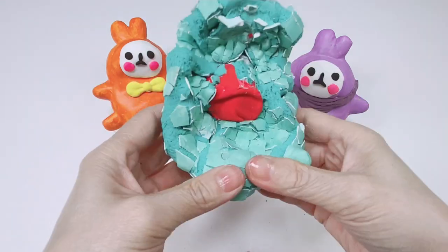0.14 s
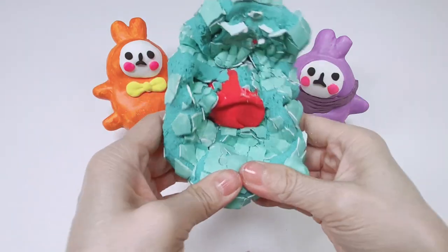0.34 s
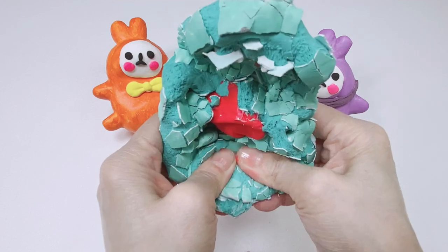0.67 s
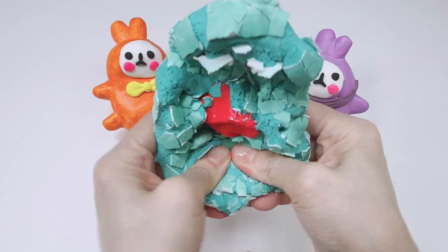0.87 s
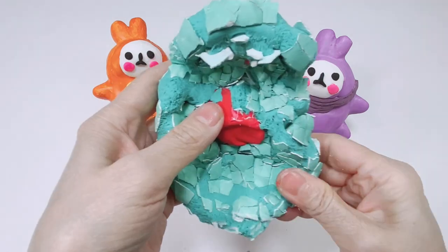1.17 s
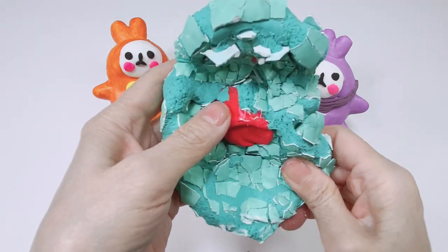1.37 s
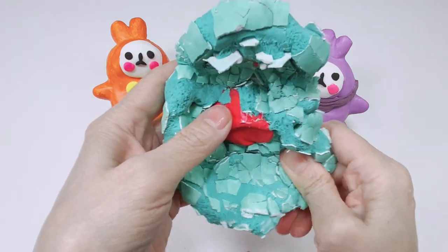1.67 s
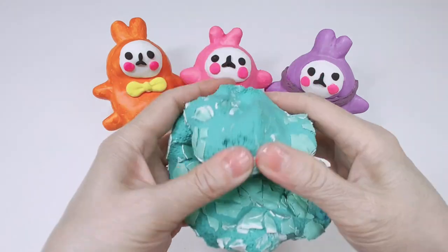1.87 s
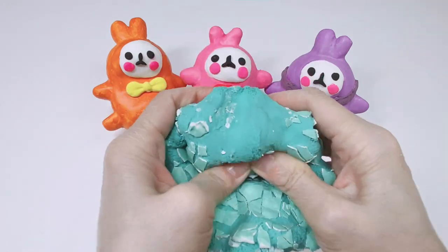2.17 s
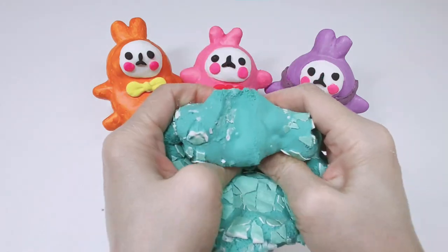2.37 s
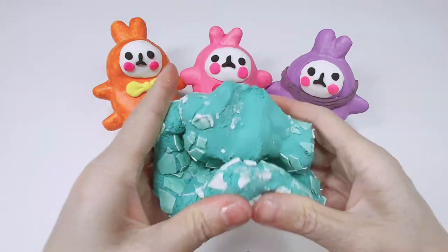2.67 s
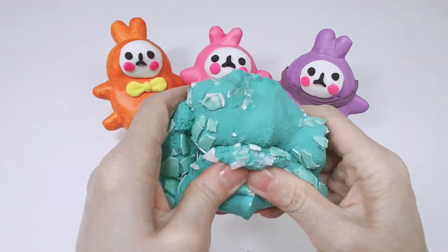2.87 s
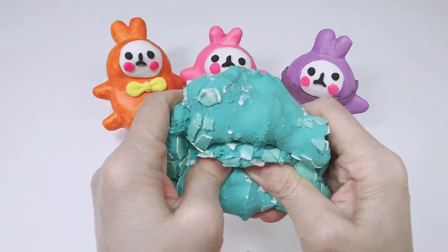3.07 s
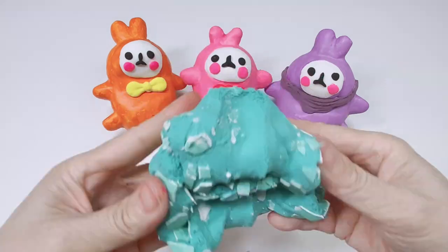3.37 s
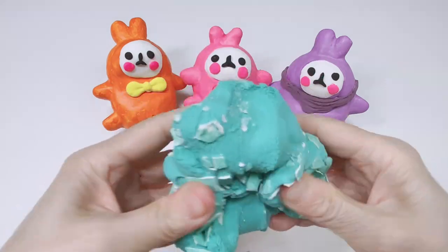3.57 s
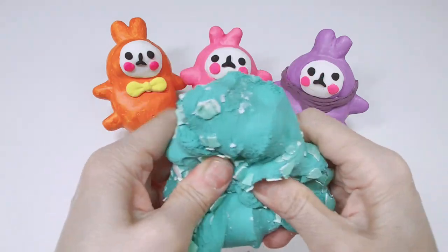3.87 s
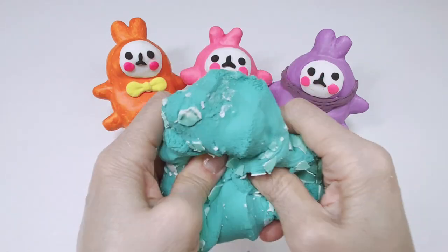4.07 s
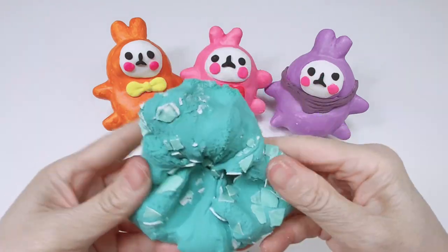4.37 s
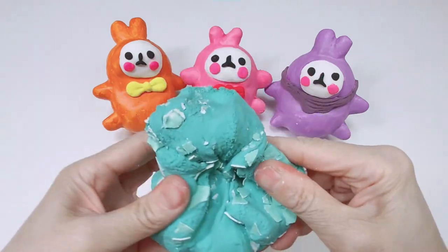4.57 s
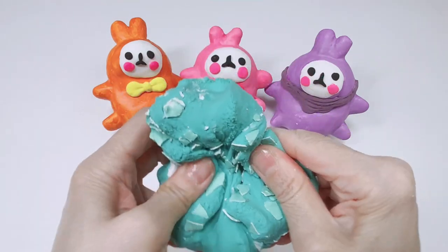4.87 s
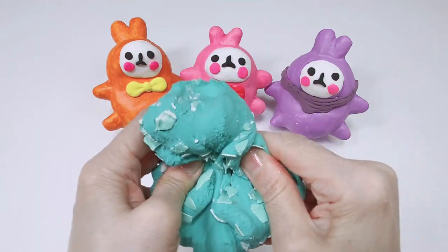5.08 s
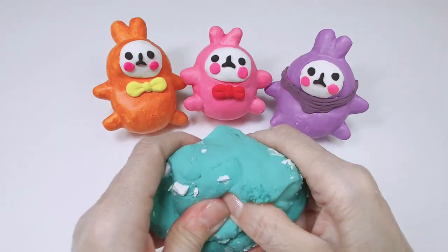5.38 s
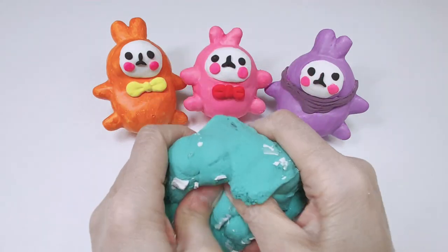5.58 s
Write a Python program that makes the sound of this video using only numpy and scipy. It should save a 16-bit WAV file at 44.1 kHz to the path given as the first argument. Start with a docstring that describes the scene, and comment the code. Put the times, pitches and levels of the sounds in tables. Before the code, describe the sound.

A close stereo pickup in a small, fairly dry room catches hands crushing soft clay inside a brittle dried crust. A tiny silent gap comes almost at once, then crackling builds to a thick cluster of bright snaps at 0.5-0.8 seconds. A quiet stretch follows, with the dull background hiss dipping until about 1.0 and a faint rub near 1.3. Crisp flakes break at 1.4-1.7; a heavier, lower crunch peaks around 2.2, then crumbles away. Mixed snaps and grit continue through 2.4-3.2, thinning before one sharp bright click near 3.5 and a soft rub at 3.6. Strong cracks return at 3.8-4.1, then thin, high ticks around 4.4, a small cluster at 4.7-4.95, and a lighter gritty squeeze near 5.4, trailing in small snaps to about 5.7. Abrupt silences of a few hundredths of a second recur near 1.0, 1.8, 2.65, 3.4, 4.3 and 5.2.

```python
"""In a small room, close to a stereo microphone, two hands crush a lump of soft clay with a dried, brittle crust.
Each squeeze builds and lets go, grinding crumbs and fine grit, made as showers of tiny damped rings.
Often a whole flake snaps off: it rings for a few cycles, cracks along its edge and knocks on the shell.
Skin rubs as short swells of grainy noise; a dull hiss lies behind, and its level dips once.
A limiter holds the loudest peaks, and short silent gaps interrupt the sound."""
import sys
import numpy as np
from scipy import signal
from scipy.fft import rfft, irfft
from scipy.io import wavfile
from scipy.ndimage import uniform_filter1d, minimum_filter1d

SR = 44100
rng = np.random.default_rng(int(sys.argv[2]) if len(sys.argv) > 2 else 0)


def log_audio(samples):
    """Write samples as a 16-bit WAV file to the path given in sys.argv[1]."""
    # one column per channel
    frames = np.atleast_2d(samples).T
    # limit to full scale, then quantise
    limited = np.clip(frames, -1, 1)
    pcm = np.round(limited * 32767).astype(np.int16)
    wavfile.write(sys.argv[1], SR, pcm)


N = 253134  # length in samples

# The loud breaks of the crust. Each row: start in seconds, flake pitch in Hz, relative level of the ring in dB,
# depth of the break in dB (a deeper break has more crack and knock beside its ring).
BREAKS = [(0.1686, 10500, -24, -33), (0.242, 4850, -32.5, 5.5), (0.266, 3200, -28, 0),
          (0.3015, 2890, -12, -1.5), (0.3033, 1720, -12, 2.5), (0.4058, 2150, -25, 7),
          (0.4089, 1560, -13.5, -13.5), (0.465, 3380, -34, 12.5), (0.523, 1130, -19.5, -5.5),
          (0.5568, 1710, -23, 3), (0.5752, 2700, -24, -11), (0.584, 2320, -11.5, -6.5),
          (0.6002, 6030, -16, -20), (0.603, 2850, -11, -5), (0.6083, 1530, -6.5, -31),
          (0.6194, 2000, -26, 5), (0.6262, 6060, -20, -3), (0.664, 5470, -21, -2),
          (0.6713, 3150, -19.5, -8), (0.7067, 2770, -20, 0.5), (0.716, 5770, -8, -9.5),
          (0.7288, 5700, -14, -7), (0.7371, 5150, -25, 9.5), (0.801, 3230, -13.5, -14),
          (1.175, 4700, -32.5, -10), (1.3634, 2980, -25.5, -8), (1.388, 3240, -17.5, 1.5),
          (1.435, 3300, -7, -3.5), (1.441, 5660, -11, -20), (1.4638, 5200, -17, -19),
          (1.5124, 5400, -27, 6), (1.5463, 6100, -26.5, 2), (1.601, 4870, -19.5, -2),
          (1.6556, 5400, -26, 2), (1.686, 3000, -23, -10), (1.6923, 3030, -14, -5.5),
          (1.722, 3230, -22.5, 5), (1.897, 1350, -19.5, -16.5), (2.1043, 2380, -23.5, -1.5),
          (2.147, 1900, -14, -10), (2.161, 1300, -17, -14), (2.1674, 1300, -20.5, -6),
          (2.1763, 1300, -17, -17), (2.1866, 1190, -15, -5), (2.195, 2490, -16, -17),
          (2.2111, 1510, -13.5, 1), (2.224, 1600, -3.5, -7.5), (2.2278, 2370, -6.5, 1.5),
          (2.2463, 2780, -25, -1), (2.268, 1300, -25, -4), (2.304, 1940, -16, -16),
          (2.3086, 2900, -10.5, -7.5), (2.424, 1650, -10, -26), (2.467, 2880, -29, -10),
          (2.4842, 2430, -26, -8), (2.505, 3500, -22, -18), (2.5236, 4200, -26, -10),
          (2.5424, 1790, -25, -8), (2.5902, 1780, -23, -1.5), (2.6121, 1620, -20.5, -5),
          (2.6842, 2830, -33, -1), (2.7373, 7700, -21, -3.5), (2.7616, 7800, -25, -8),
          (2.7855, 3250, -26, -11), (2.8033, 8000, -31, 6.5), (2.833, 3130, -11.5, -11),
          (2.8405, 1880, -16.5, -16), (2.868, 3230, -18.5, -17), (2.878, 1650, -18.5, -18),
          (2.9247, 2520, -25.5, 8), (2.9702, 2550, -14.5, -16), (2.982, 1830, -21.5, 5.5),
          (2.9866, 1390, -20, -2), (3.035, 10000, -28, 0), (3.0368, 3100, -10, -12.5),
          (3.1158, 2700, -20, -27), (3.131, 6100, -16.5, -9), (3.132, 2800, -15.5, -8),
          (3.1989, 6100, -13.5, 0.5), (3.492, 9500, -6, -21), (3.6124, 1310, -26, -8),
          (3.6355, 1700, -32.5, 10.5), (3.7098, 4600, -29.5, 15.5), (3.7926, 3600, -7, -8),
          (3.812, 2450, -12, -9), (3.82, 2200, -20, -10), (3.9089, 2350, -4, -11),
          (3.9104, 1700, -10, -4.5), (3.984, 5800, -21, -5), (4.012, 4500, -22, 2), (4.0348, 4940, -13, 0),
          (4.039, 2270, -22, 2), (4.0636, 3180, -11, -1.5), (4.245, 2490, -25, -34),
          (4.2547, 2880, -16, -40), (4.3513, 12000, -24, -18), (4.3926, 10500, -12.5, -13),
          (4.433, 10600, -27, -7), (4.4855, 9800, -34, -1), (4.534, 10600, -24, -22),
          (4.7185, 3800, -20.5, -7.5), (4.7676, 2930, -12.5, -1.5), (4.818, 4700, -19, 0),
          (4.8261, 4540, -13, -1), (4.8287, 4000, -16.5, 3), (4.8576, 4640, -24.5, 8),
          (4.89, 2580, -18.5, 2.5), (4.9385, 2770, -14.5, -4), (5.0689, 1520, -25.5, -24),
          (5.1101, 3260, -22, -11.5), (5.2705, 2800, -25, -7.5), (5.33, 3070, -21, -17),
          (5.386, 3860, -30, -15), (5.4364, 3020, -23.5, -2), (5.4855, 2900, -28, -8),
          (5.5065, 2680, -17.5, -20), (5.5825, 2850, -30.5, -6), (5.6046, 2570, -27, -20),
          (5.6413, 2550, -20.5, -6.5), (5.663, 3300, -30.5, 8.5), (5.7113, 2940, -17.5, -15),
          (5.7287, 4400, -21.5, -2)]


def undb(db):
    """Turn decibels into gain."""
    return 10 ** (np.asarray(db) / 20)


def unit(x):
    """Scale to an energy of one in each channel."""
    energy = np.sum(x ** 2, axis=-1, keepdims=True)
    return x / np.sqrt(energy + 1e-18)


def band(x, lo_hz, hi_hz):
    """Keep the sound between two pitches, with a filter that only looks back in time."""
    top_hz = min(hi_hz, SR / 2 - 1000)
    return signal.sosfilt(signal.butter(2, [lo_hz, top_hz], "band", fs=SR, output="sos"), x)


def colour(x, points, size=4096):
    """Shape the spectrum through (Hz, dB) points, with a filter that only looks back in time."""
    hz, db = np.transpose(points)
    bins_hz = np.fft.rfftfreq(size, 1 / SR)
    log_gain = np.log(undb(np.interp(np.log(bins_hz + 1), np.log(hz), db)))
    # folding the cepstrum forward puts the filter's energy as early as possible
    cepstrum = irfft(log_gain)
    cepstrum[1:size // 2] *= 2
    cepstrum[size // 2 + 1:] = 0
    response = irfft(np.exp(rfft(cepstrum)))
    return signal.fftconvolve(x, response[None], axes=1)[:, :x.shape[1]]


def pair(mid, side, likeness):
    """Mix two unrelated signals into left and right with a given correlation."""
    c = np.clip(likeness, -1, 1)
    left_right = np.array([[1], [-1]])
    return (mid * np.sqrt(1 + c) + left_right * side * np.sqrt(1 - c)) / np.sqrt(2)


def add(out, x, s):
    """Mix a short sound in at time s, in seconds."""
    i = max(0, int(s * SR))
    out[:, i:i + x.shape[1]] += x[:, :max(0, N - i)]


def snaps(ring_cycles=0.46, crack_s=0.00033, knock_s=0.001, crack_likeness=0.89, knock_likeness=0.94,
          lag_s=.000004, ring_db=1.5, crack_db=2.0, knock_db=.5, size=512):
    """Each break: a flake rings, its edge cracks, the clay-filled shell knocks; depth and flake size set the mix."""
    # The tone of the shell's knock. Each row: frequency in Hz, level in dB.
    shell_tone = [(100, -20), (280, -21), (500, -8.5), (800, -6), (1150, 2), (1900, -1), (2800, -5.5),
                  (5000, -12.5), (10000, -51)]
    # flakes larger (lower) than a middling one crack less; the larger the flake, the harder it knocks
    mid_flake_hz, crack_db_per_octave, knock_db_per_octave = 2700, 14, -6.5
    knock_share = 0.8  # dB of knock for each dB of depth
    out = np.zeros((2, N))
    t = np.arange(size) / SR
    span = np.sqrt(.002 * SR)  # levels are rms over 2 ms
    for s, hz, db, depth_db in BREAKS:
        chance = rng.standard_normal((5, size))
        octave = np.log2(hz / mid_flake_hz)
        crack_level = depth_db + crack_db + crack_db_per_octave * min(octave, 0)
        knock_level = knock_share * depth_db + knock_db + knock_db_per_octave * octave

        # a flake off centre reaches one port of the microphone a little sooner
        age = np.maximum(t + np.array([[1], [-1]]) * lag_s * chance[4, 0], 0)
        ring = np.sign(chance[4, 1]) * flake(age, hz, ring_cycles)

        # the fracture speeds up, then runs out
        fracture = pair(chance[0], chance[1], crack_likeness) * t * np.exp(-t / crack_s)
        crack = unit(band(fracture, 3440, 10700))

        thud = pair(chance[2], chance[3], knock_likeness) * np.exp(-t / knock_s)
        knock = unit(colour(thud, shell_tone, size=size))

        mix = undb(ring_db) * ring + undb(crack_level) * crack + undb(knock_level) * knock
        add(out, span * undb(db) * mix, s)
    return out


def flake(age, hz, ring_cycles=0.46, ring_s=.000045):
    """A clay-damped flake swings up within about a cycle and dies after a few more."""
    swing = age / (ring_cycles / hz + ring_s)
    return unit(swing * np.exp(-swing) * np.sin(2 * np.pi * hz * age))


def kneading(size=64):
    """Levels in dB of crumbs and of grit: each squeeze swells to its hardest moment and falls away;
    around each break the crust splinters just before and sheds debris just after."""
    # Each row: hardest moment in seconds, build and release times in seconds for a change of 10 dB,
    # level of the crumbs in dB, level of the fine grit over the crumbs in dB.
    squeezes = [(0.058, 0.035, 0.023, -33, -5.5), (0.32, 0.17, 0.03, -36.5, -3.5),
                (0.42, .02, 0.052, -40, -16), (0.62, 0.22, 0.16, -29.5, -0.5),
                (1.29, 0.049, 0.14, -41.5, 3), (1.44, .04, 0.11, -34, -1), (1.72, 0.11, 0.031, -52, 19),
                (1.93, 0.088, 0.21, -40.5, -4.5), (2.199, 0.1, 0.32, -24, -12),
                (2.42, 0.14, 0.13, -31.5, -26), (2.86, 0.14, 0.14, -32, -2), (3.04, 0.19, 0.31, -32.5, -5),
                (3.78, 0.14, .06, -29, -1.5), (3.93, 0.045, 0.094, -34, -2),
                (4.071, 0.07, 0.023, -24.5, -8), (4.199, .04, 0.04, -36, 0), (4.78, 0.42, 0.33, -47.5, 10),
                (5.38, 0.073, .14, -28.5, -7)]
    # small fractures around a break: times for 10 dB before and after it, and level against the break's own
    splinter_s, debris_s, debris_db = 0.0061, 0.014, -16
    fine_flake_hz = 4460  # flakes above this shed mostly grit, those below mostly crumbs
    t = np.arange(0, N, size) / SR

    def swell(s, build_s, release_s, db):
        """Power that rises and falls evenly in dB."""
        steps_down = np.maximum((s - t) / build_s, (t - s) / release_s)
        return undb(db - 10 * np.clip(steps_down, 0, 20)) ** 2

    crumbs = grit = 0
    for s, build_s, release_s, db, grit_db in squeezes:
        power = swell(s, build_s, release_s, db)
        crumbs = crumbs + power
        grit = grit + power * undb(grit_db) ** 2
    for s, hz, db, depth_db in BREAKS:
        power = swell(s, splinter_s, debris_s, db + debris_db)
        fine = hz ** 2 / (hz ** 2 + fine_flake_hz ** 2)
        crumbs = crumbs + power * (1 - fine)
        grit = grit + power * fine
    every_sample = np.arange(N) / SR
    return [np.interp(every_sample, t, 10 * np.log10(power)) for power in (crumbs, grit)]


def crackle(level_db, pitch_hz, octaves, per_s, spread_db, lag_s, doubling_db=14, count=16000, size=128):
    """A shower of tiny fractures, each with its own pitch; harder kneading breaks more of them and larger ones."""
    when, luck, strength = rng.random((count, 3)).T
    height, place = rng.standard_normal((count, 2)).T
    start = (when * N).astype(int)
    candidates_per_s = count * SR / N

    # per_s is the rate at -30 dB; it doubles every doubling_db
    rate = per_s * 2 ** ((level_db[start] + 30) / doubling_db)
    rate = np.minimum(rate, candidates_per_s)

    # many small grains, few large ones; the sparser the shower, the more each grain must carry
    sizes = undb(-spread_db * np.log(np.maximum(strength, .012)))
    sizes = sizes / np.sqrt(np.mean(sizes ** 2))
    sizes = sizes * undb(level_db[start]) * np.sqrt(SR / rate)
    hz = np.clip(pitch_hz * 2 ** (octaves * height), 500, 14000)

    # keep just enough candidates to give the rate
    k = np.flatnonzero(luck < rate / candidates_per_s)[:, None]
    samples = np.arange(size)
    out = []
    for port in (1, -1):
        age = np.maximum(samples / SR + port * lag_s * place[k], 0)
        grains = (-1) ** k * sizes[k] * flake(age, hz[k])
        out.append(np.bincount((start[k] + samples).ravel(), grains.ravel(), N)[:N])
    return np.array(out)


def rubs(width=0.38, grain=0.88):
    """Skin sticks and slips on clay and crust: a short grainy swell of noise around one pitch."""
    # Each row: middle in seconds, length in seconds, pitch in Hz, level in dB.
    strokes = [(0.426, 0.061, 1310, -32), (0.834, 0.12, 584, -40), (1.287, 0.18, 2440, -39.5),
               (3.621, 0.046, 746, -36), (5.404, 0.11, 2040, -53)]
    out = np.zeros((2, N))
    t = np.arange(SR // 2) / SR - 1 / 4  # seconds from the middle of the stroke
    for s, length, hz, db in strokes:
        # noise of uneven strength sounds grainy
        slips = rng.standard_normal(len(t)) * np.exp(grain * rng.standard_normal(len(t)))
        swell = np.cos(np.pi * np.clip(t / length, -.5, .5))
        # width is in octaves to each side of the pitch
        tone = unit(band(slips, hz * 2 ** -width, hz * 2 ** width)) * np.sqrt(len(t))
        rub = undb(db) * tone * swell
        add(out, rub[None], s + t[0])
    return out


def room(x, t60_s=0.23, treble_t60_s=0.24, tail_db=-12.0, near_db=-12, near_s=0.0035, gap_s=0.013):
    """Hands and table scatter the sound at once; the walls return a short diffuse tail."""
    # The tone of the reflections. Each row: frequency in Hz, level in dB.
    reflection_tone = [(150, 1.5), (450, 4), (800, 0), (1300, 1.5), (2700, 3.5), (3900, 1.5), (5800, 7),
                       (9000, 3), (15000, -5.5)]
    ports_part_hz = 4700  # above this, reflections differ between the two ports
    t = np.arange(SR // 2) / SR
    # the two ports hear the same bass but unrelated treble
    likeness = 1 / (1 + (np.fft.rfftfreq(len(t), 1 / SR) / ports_part_hz) ** 2)
    diffuse = irfft(pair(*rfft(rng.standard_normal((2, len(t)))), likeness), len(t))

    # each band falls by 60 dB in its own t60; the tail builds up over gap_s
    treble = band(diffuse, 5300, 22500) * 1000 ** (-t / treble_t60_s)
    lows = band(diffuse, 76, 6860) * 1000 ** (-t / t60_s)
    tail = (lows + treble) * np.minimum(t / gap_s, 1) ** 2
    near = diffuse * np.exp(-t / near_s) * (t > .0007)
    response = colour(undb(tail_db) * unit(tail) + undb(near_db) * unit(near), reflection_tone)
    return signal.fftconvolve(x, response, axes=1)[:, :N]


def hiss(level_db=-37, likeness=0.073):
    """Steady dull background noise, mostly unrelated left and right; its level dips once."""
    # The tone of the hiss. Each row: frequency in Hz, relative level in dB per Hz.
    hiss_tone = [(20, 0.5), (40, -11), (70, -6), (120, -0.5), (300, -0.5), (700, -6.5), (1500, -10.5),
                 (3000, -17.5), (7000, -22), (15000, -25)]
    # The one dip, a single row: start in seconds, end in seconds, change of level in dB.
    dip = (0.72, 1.01, -7.5)
    noise = colour(pair(*rng.standard_normal((2, N)), likeness), hiss_tone)
    t = np.arange(N) / SR
    start, end, dip_db = dip
    dipping = (t > start) & (t < end)
    return unit(noise) * np.sqrt(N) * undb(level_db + dip_db * dipping)


def scene(crumbs_db=0.0, grit_db=1.0):
    """Snaps, crumbs, grit and rubbing in the room, over the background."""
    crumbs_level, grit_level = kneading()
    crumbs = crackle(crumbs_level + crumbs_db, pitch_hz=2045, octaves=0.65, per_s=600,
                     spread_db=3.5, lag_s=.000007)
    grit = crackle(grit_level + grit_db, pitch_hz=5900, octaves=0.63, per_s=2000,
                   spread_db=3.5, lag_s=.000011)
    # these sounds carry almost no bass
    no_bass = signal.butter(1, 160, "high", fs=SR, output="sos")
    clay = signal.sosfilt(no_bass, snaps() + crumbs + grit + rubs())
    return clay + room(clay) + hiss()


def record(dry, ceiling=1.0, fade_s=0.01, size=25, top_hz=16000):
    """A fast limiter holds the peaks, the sound fades into silent gaps, and the top of the treble is cut."""
    # The silent gaps. Each row: start in seconds, end in seconds.
    gaps = [(.012, .045), (.989, 1.029), (1.777, 1.811), (2.635, 2.674), (3.41, 3.464), (4.311, 4.349),
            (5.181, 5.219)]
    t = np.arange(N) / SR
    allowed = ceiling / np.maximum(np.abs(dry).max(axis=0), ceiling)
    # hold the lowest gain around each peak, then smooth it
    gain = uniform_filter1d(minimum_filter1d(allowed, size), size)
    held = dry * gain
    for start, end in gaps:
        fade_out = (start - t) / fade_s
        fade_in = (t - end) / fade_s * 2  # twice as fast
        held = held * np.clip(np.maximum(fade_out, fade_in), 0, 1)
    return signal.sosfilt(signal.ellip(8, .2, 80, top_hz, fs=SR, output="sos"), held)


dry = scene()
out = record(dry)
log_audio(out)
```